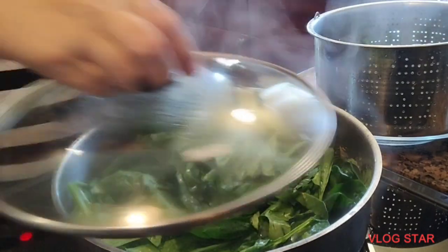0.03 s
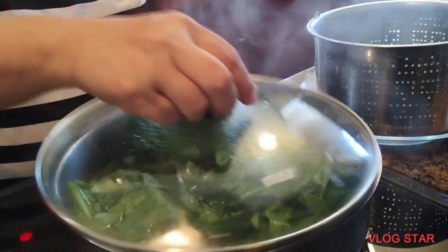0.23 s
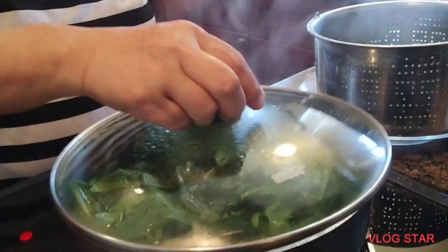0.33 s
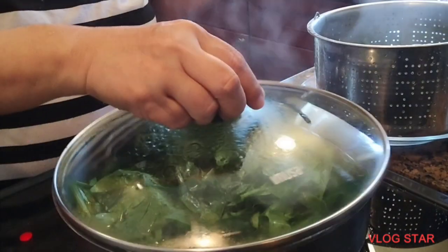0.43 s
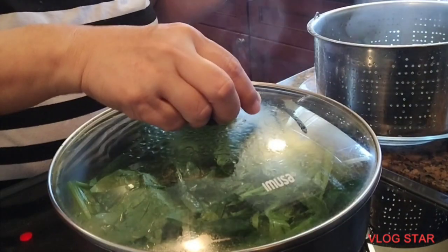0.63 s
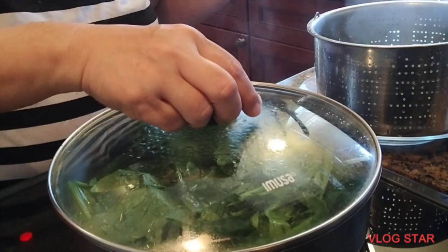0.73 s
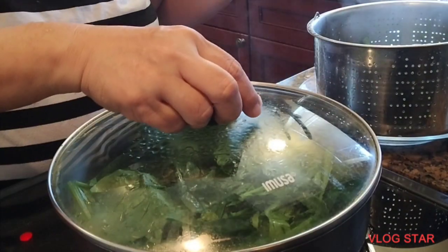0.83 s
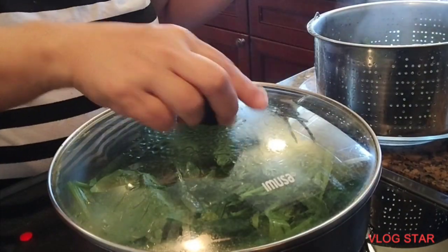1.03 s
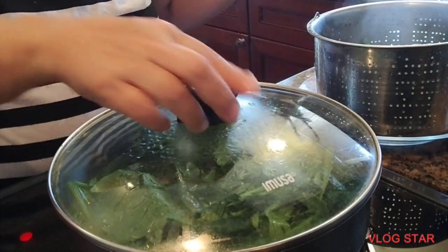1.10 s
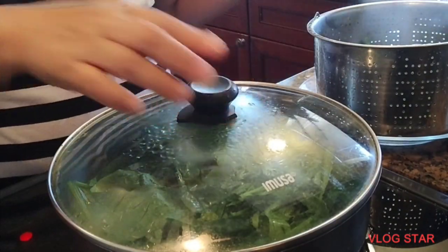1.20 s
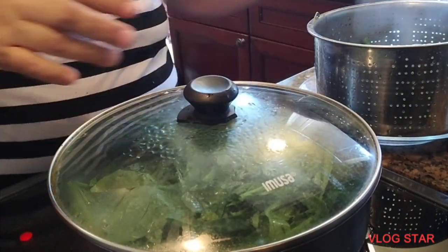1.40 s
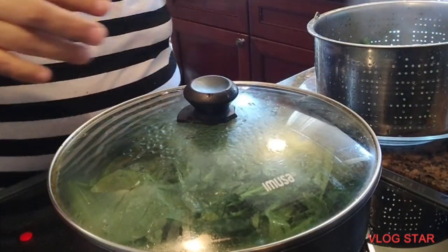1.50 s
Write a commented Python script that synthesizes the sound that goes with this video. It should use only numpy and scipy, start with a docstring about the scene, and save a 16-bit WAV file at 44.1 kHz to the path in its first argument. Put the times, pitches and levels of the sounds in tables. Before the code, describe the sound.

Close stereo pickup in a home kitchen: a pot lid strikes the rim, rattles in uneven clanks with a brief scrape and a hollow low boom, then stops, over very faint low rumble and hiss.

```python
"""A glass lid with a steel rim is set down by hand on a steel pot in a small kitchen.
The rim lands on one side, skids, then clatters into its seat; the hand damps the glass while the pot booms briefly.
Each touch drives decaying sines (clear modes) and bands of decaying noise (crowded modes); skids add random grains.
Under it the stove hums (two beating tones plus narrow noise) and hisses, and the pot simmers (coloured noise)."""
import sys
import numpy as np
from scipy import signal
from scipy.io import wavfile

SR = 44100
rng = np.random.default_rng(int(sys.argv[2]) if len(sys.argv) > 2 else 0)


def generate_wav(sig):
    """Save sig (samples, or channels by samples) to the path in sys.argv[1] as 16-bit PCM at SR."""
    pcm = np.round(np.clip(np.atleast_2d(sig).T, -1, 1) * 32767).astype(np.int16)
    wavfile.write(sys.argv[1], SR, pcm)


N = 68355
T = np.arange(N) / SR
EDGES_HZ = np.geomspace(35, 17000, 25)  # noise band edges

# Stereo image of the lid at the microphone. Each row: frequency in Hz, left minus right in dB,
# left-right likeness (0 to 1) of the clatter, share of the tick's own pan.
IMAGE = [(119.27, 0, .99, 0.027), (450, 5, 0.56, 0), (950, 6, .6, 0.49), (1900, 0.5, .45, 0),
         (3800, -2.5, .3, 0.068), (6000, -4.5, .35, .3), (9000, 2.5, .45, 0.74), (16000, 10.5, .4, 0.63)]


def from_db(db):
    """Decibels to gain."""
    return 10 ** (np.asarray(db) / 20)


def rms_one(x):
    """Scale to unit rms."""
    return x / np.sqrt(np.mean(x ** 2) + 1e-20)


def at_hz(rows, hz):
    """Columns of a table at one frequency, interpolated over log frequency."""
    freqs, *columns = np.transpose(rows)
    return [np.interp(np.log(hz), np.log(freqs), column) for column in columns]


def level(rows):
    """Gain over time from rows of seconds and dB."""
    return from_db(np.interp(T, *np.transpose(rows)))


def decay(t60_s):
    """Exponential fade from time zero, down 60 dB at t60."""
    return np.exp(-np.log(1000) * T / max(t60_s, 0.005))


def convolve(x, response):
    """Pass each channel through a response."""
    return signal.fftconvolve(np.atleast_2d(x), np.atleast_2d(response), axes=1)[:, :N]


def highpass(x, order, cut_hz):
    """Butterworth high-pass."""
    return signal.sosfilt(signal.butter(order, cut_hz, "high", fs=SR, output="sos"), x)


def band_noise(low_hz, high_hz):
    """One band of noise, rms 1."""
    sos = signal.butter(3, [low_hz, high_hz], "band", fs=SR, output="sos")
    settled = signal.sosfilt(sos, rng.standard_normal(N + SR // 2))[-N:]
    return rms_one(settled)


def stereo_band(low_hz, high_hz, alike):
    """One band of noise with a given left-right likeness (mid plus side noise), rms 1."""
    alike = np.clip(alike, 0, 1)
    mid = np.sqrt(1 + alike) * band_noise(low_hz, high_hz)
    side = np.sqrt(1 - alike) * band_noise(low_hz, high_hz)
    return rms_one(mid + side * [[1], [-1]])


def diffuse_bands():
    """Yield centre in Hz and stereo noise of each band, much alike in both ears only in the bass."""
    # Each row: frequency in Hz, left-right likeness.
    likeness = [(60, 0.94), (200, 0.97), (500, 0.22), (1200, 0.083), (4000, 0.033), (15000, 0.045)]
    for low_hz, high_hz in zip(EDGES_HZ, EDGES_HZ[1:]):
        hz = np.sqrt(low_hz * high_hz)
        yield hz, stereo_band(low_hz, high_hz, at_hz(likeness, hz)[0])


def diffuse_noise(spectrum):
    """Stereo noise coloured by rows of Hz and relative dB per Hz, rms 1."""
    # sqrt(hz): power grows with the bandwidth
    return rms_one(sum(from_db(at_hz(spectrum, hz)[0]) * np.sqrt(hz) * noise
                       for hz, noise in diffuse_bands()))


def stove():
    """Two low tones beat into a throbbing hum, narrow noise makes it waver; a faint steady hiss."""
    # Hum envelope. Each row: time in seconds, level in dB.
    hum_level = [(0, -58.5), (.55, -85), (.69, -38.5), (.79, -42.5), (.85, -62), (.96, -75), (1.08, -65),
                 (1.17, -45), (1.35, -49), (1.49, -47.5), (1.55, -60)]
    # Hiss colour. Each row: frequency in Hz, relative density in dB per Hz.
    hiss_colour = [(1000, -1.5), (2500, 0), (5000, -2.5), (7000, -1.5), (9000, 2.5), (11000, -5),
                   (13000, -3.5), (16000, -2.5)]
    hum_hz, beat_hz, beat_share = 123.7, 16.5, 0.43
    waver_share, waver_half_width_hz = 0.4, 24
    hiss_db = -67
    waver = band_noise(hum_hz - waver_half_width_hz, hum_hz + waver_half_width_hz)
    upper_tone = np.sin(2 * np.pi * hum_hz * T)
    lower_tone = beat_share * np.sin(2 * np.pi * (hum_hz - beat_hz) * T)
    hum = rms_one(rms_one(upper_tone + lower_tone) + waver_share * waver)
    return level(hum_level) * hum + from_db(hiss_db) * diffuse_noise(hiss_colour)


def simmer():
    """A dull noise rumble that wells up now and then and keeps the pot faintly ringing."""
    # Rumble colour. Each row: frequency in Hz, relative density in dB per Hz.
    rumble_colour = [(18, -66), (30, -34.5), (64, -21), (118, 2), (134, -4.5), (153, -20), (273, -14),
                     (303, -19), (374, -15.5), (600, -33.5), (721, -26), (1070, -31), (4190, -50),
                     (9220, -49.5), (16000, -64.5)]
    # Rumble envelope. Each row: time in seconds, level in dB.
    rumble_level = [(0, -53), (.2, -52), (.65, -41), (.8, -51.5), (.95, -53), (1.18, -50.5), (1.55, -50.5)]
    # Swells. Each row: peak time in seconds, peak level in dB.
    swell_peaks = [(.785, -47.5), (.88, -50), (1.02, -53), (1.18, -53.5), (1.429, -56.5)]
    # Swell colour. Each row: frequency in Hz, relative density in dB per Hz.
    swell_colour = [(60, -8), (120, 0), (250, -5.5), (400, -11), (600, -16.5), (760, -15.5), (1400, -22.5),
                    (2800, -35.5), (5000, -45), (16000, -71)]
    # Pot resonances. Each row: frequency in Hz, level in dB.
    pot_notes = [(181, -70.5), (270, -64.5), (372, -66), (735, -70)]
    top_hz, swell_sigma_s = 2320, 0.023
    half_width = 0.045  # of a note's band, as share of its pitch
    lowpass = signal.butter(2, top_hz, fs=SR, output="sos")
    rumble = signal.sosfilt(lowpass, diffuse_noise(rumble_colour))
    swells = sum(from_db(db) * np.exp(-((T - s) / swell_sigma_s) ** 2 / 2) for s, db in swell_peaks)
    notes = sum(from_db(db) * band_noise(hz * (1 - half_width), hz * (1 + half_width))
                for hz, db in pot_notes)
    return level(rumble_level) * rumble + swells * diffuse_noise(swell_colour) + notes


def kitchen(x):
    """Diffuse echo: the mono sound through noise bands that build quickly, then decay."""
    # Each row: frequency in Hz, relative echo level in dB, t60 in seconds.
    room = [(100, -26.5, .48), (400, -18.5, 1), (1200, -13.5, 0.22), (2800, -18.5, 0.53),
            (6077, -14.5, 0.23), (13000, -9, 0.2)]
    build_s = 0.0032
    relative_step = EDGES_HZ[1] / EDGES_HZ[0] - 1
    response = 0
    for hz, noise in diffuse_bands():
        db, t60_s = at_hz(room, hz)
        tail = rms_one(noise * decay(t60_s) * (1 - np.exp(-T / build_s)))
        # level by bandwidth and length
        response = response + from_db(db) * tail * np.sqrt(2 * relative_step * hz / SR / N)
    return convolve(x.mean(axis=0), response)


def touches(hz):
    """Strength of every rim touch at one frequency, as single-sample clicks left and right."""
    # Rim touches pot. Each row: time in seconds, relative level in dB of thud, knock, clonk, clank
    # and tick, tick pan in dB left minus right (before the share in IMAGE).
    contacts = [(.154, -52, -41.5, -79, -84.5, -90.5, 0.5), (.228, -10.5, -10.5, -39, -25.5, -19, 5.5),
                (.245, -18.5, -34, -60.5, -55.5, -58.5, 11.5),
                (0.2864, -20, -18, -21.5, -15.5, -23.5, 13.5), (0.2942, -10.5, -26, -26.5, -23.5, -10, 14),
                (0.3004, -10.5, -27.5, -38.5, -34, -35.5, 17), (0.309, -22.5, -19, -29, -18, -55, 5),
                (.333, -20, -37, -30, -30.5, -32, 11), (0.35, -26, -30, -45, -39, -60, -1),
                (0.4, -22.5, -62, -36, -42, -62, 7), (0.4122, -17, -37.5, -39, -42, -37.5, 10.5),
                (0.4408, -18.5, -24.5, -36, -32, -29.5, 7), (.446, -32.5, -24, -36, -55, -51, 8),
                (.463, -24, -36, -33.5, -38, -48, 26), (0.481, -20.5, -30, -33, -46, -33.5, 10),
                (.488, -9, -24, -33, -39, -26, 5), (0.4931, -29, -34, -16, -14, -15.5, -1),
                (.502, -16, -16, -27.5, -22.5, -24, -2), (.510, -12, -18, -11, -25.5, -28, 6.5),
                (0.531, -18.5, -20.5, -22, -21.5, -28.5, -1), (.543, -21, -15, -11.5, -78, -45, 2),
                (.556, -21.5, -21, -32, -37, -43, 1), (0.589, -25.5, -58, -50, -73, -80, 0),
                (0.609, -59, -37.5, -55, -67, -75, 0)]
    # Centres in Hz of thud, knock, clonk, clank and tick.
    register_hz = [150, 450, 800, 1900, 10000]
    spread_db = 3  # random, per touch and frequency
    s, *registers, tick_pan_db = np.transpose(contacts)
    db = np.array(at_hz(np.column_stack([register_hz, registers]), hz))
    db = db + spread_db * rng.standard_normal(len(s))
    image_pan_db, _, tick_share = at_hz(IMAGE, hz)
    pan_db = image_pan_db + tick_share * tick_pan_db
    clicks = np.zeros((2, N))
    clicks[:, (s * SR).astype(int)] = from_db(db + pan_db * np.array([[0.5], [-0.5]]))
    return clicks


def pot_ring():
    """Boom of the pot and the few clear notes of the lid: touches excite decaying sines."""
    # Clear modes. Each row: frequency in Hz, relative level in dB, t60 in seconds.
    modes = [(92, -35.5, 0.136), (103.2, -3.5, 0.29), (128, -7, 0.17), (149, -8.5, 0.18),
             (179.35, -2, 0.22), (269.7, -9.5, 0.31), (357, -7.5, 0.066), (407.5, -7.5, 0.14),
             (458, 2, 0.0725), (501, -19.5, .14), (712, -10.5, .22), (763.3, -3.5, 0.082), (846, -18, 0.18),
             (927, -16, 0.083), (1120, -14.5, 0.04), (1376.5, -8.5, 0.19), (1582, -24, .14),
             (2076, -9.5, 0.035), (2350, -3, 0.078), (2896, -12, 0.15), (5694, -19.5, .12)]
    all_modes_db = -5.5
    ring = 0
    for hz, db, t60_s in modes:
        mode = from_db(all_modes_db + db) * np.sin(2 * np.pi * hz * T) * decay(t60_s)
        ring = ring + convolve(touches(hz), mode)
    return ring


def grinding():
    """Power of the tiny random catches of a rim skidding along the pot."""
    # Each row: start in seconds, end in seconds, relative grain level in dB.
    skids = [(0.415, 0.472, -57.5), (0.478, 0.557, -47.5)]
    grains_per_s, spread_db, grain_t60_s = 1300, 1, 0.036
    size = sum(from_db(db) * ((T > start) & (T < end)) for start, end, db in skids)
    catches = rng.random(N) < grains_per_s / SR
    spread = from_db(spread_db * np.clip(rng.standard_normal(N), -2, 2))
    grains = size * catches * spread
    return convolve(grains ** 2, decay(grain_t60_s) ** 2)


def rim_clatter():
    """Crowded modes of rim and glass: noise bands that each touch wakes and that die quickly under the hand."""
    # Each row: frequency in Hz, relative level in dB per band, t60 in seconds.
    crowded_modes = [(90, -7, .14), (250, -10.5, 0.18), (450, -4.5, 0.032), (604, -15, .09), (893, -5, .12),
                     (1300, -5, .13), (2300, -7, 0.16), (3240, -13.5, 0.17), (6500, -6.5, .1),
                     (9800, -2.5, .07), (13000, -18, 0.054), (15940, -23.5, .08)]
    clatter, grind_power = 0, grinding()
    for low_hz, high_hz in zip(EDGES_HZ[3:], EDGES_HZ[4:]):
        hz = np.sqrt(low_hz * high_hz)
        db, t60_s = at_hz(crowded_modes, hz)
        # powers add, amplitudes do not
        power = convolve(touches(hz) ** 2, (decay(t60_s) / 2) ** 2) + grind_power
        noise = stereo_band(low_hz, high_hz, at_hz(IMAGE, hz)[1])
        clatter = clatter + from_db(db) * np.sqrt(np.abs(power)) * noise
    return clatter


def scene():
    """The lid on the pot, a little to the left, in the kitchen with stove and simmer."""
    body_low_hz = 78  # the pot radiates little below this
    right_lag_s = 0.00008
    left, right = highpass(pot_ring() + rim_clatter(), 3, body_low_hz)
    lid = np.array([left, np.interp(T - right_lag_s, T, right)])
    return lid + kitchen(lid) + stove() + simmer()


def record(dry, low_cut_hz=40, ceiling=0.78, top_cut_hz=16000):
    """The microphone rounds the peaks and thins the deep bass; the top is cut."""
    rounded = ceiling * np.tanh(dry / ceiling)
    thin = highpass(rounded, 2, low_cut_hz)
    return signal.sosfilt(signal.ellip(10, 0.1, 80, top_cut_hz, fs=SR, output="sos"), thin)


dry = scene()
out = record(dry)
generate_wav(out)
```